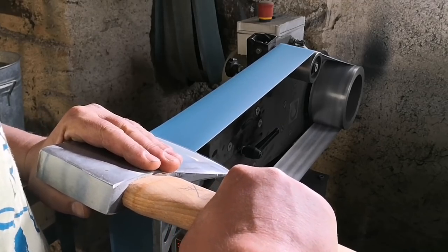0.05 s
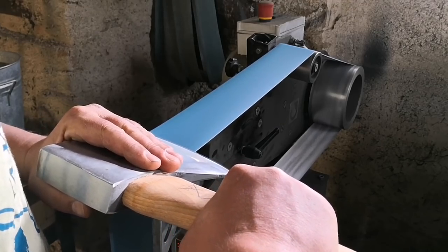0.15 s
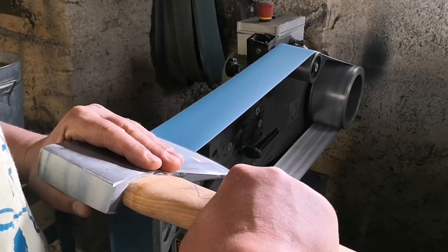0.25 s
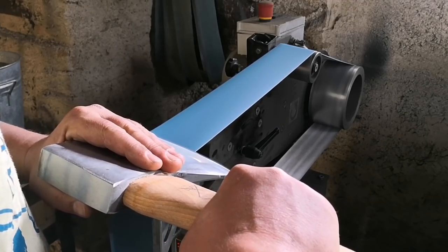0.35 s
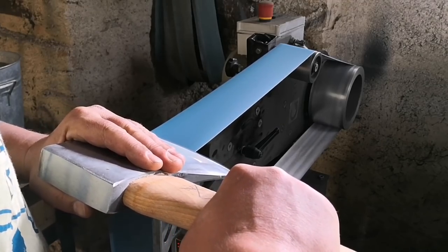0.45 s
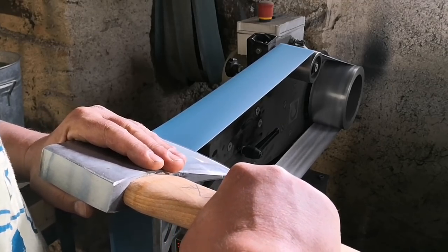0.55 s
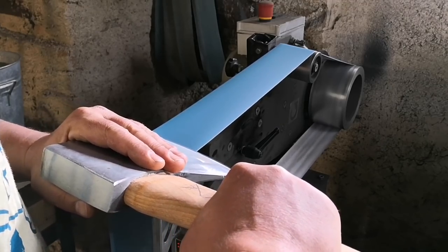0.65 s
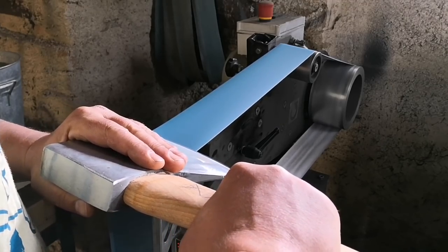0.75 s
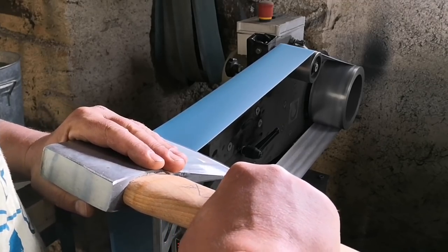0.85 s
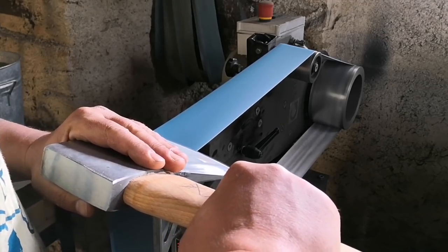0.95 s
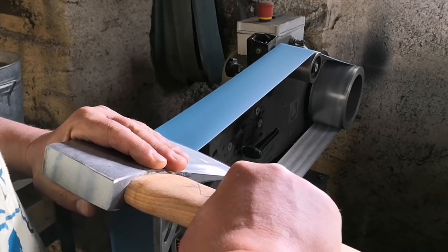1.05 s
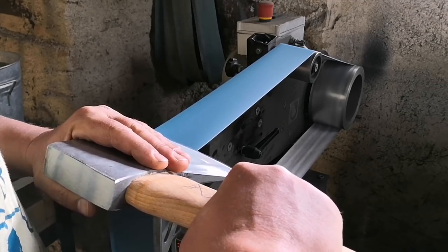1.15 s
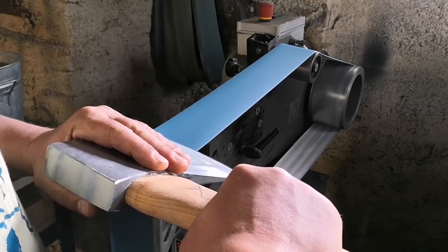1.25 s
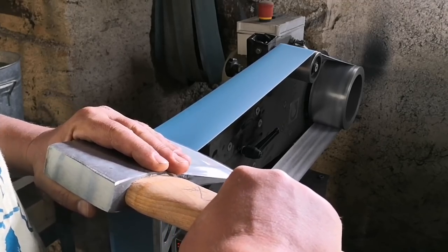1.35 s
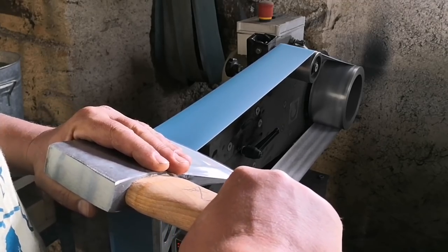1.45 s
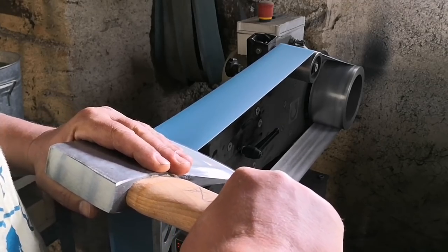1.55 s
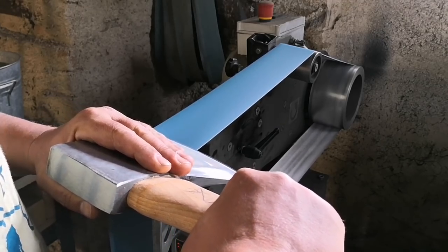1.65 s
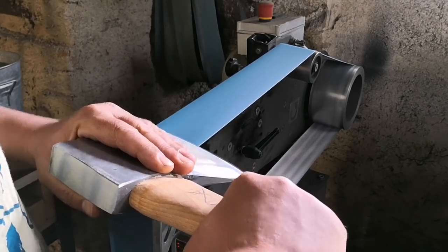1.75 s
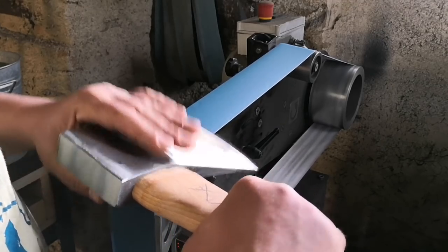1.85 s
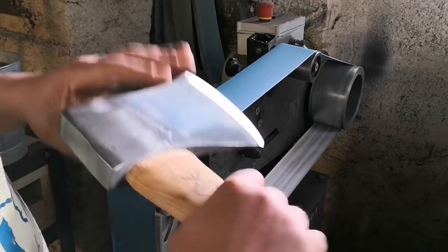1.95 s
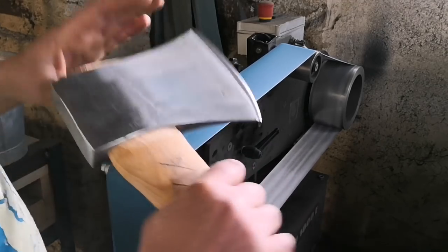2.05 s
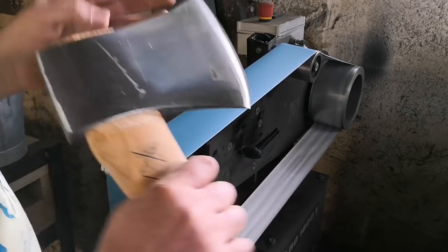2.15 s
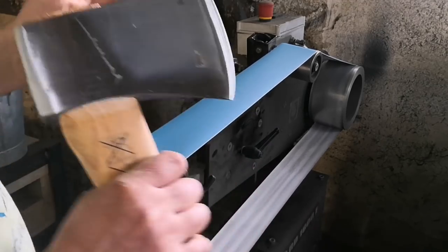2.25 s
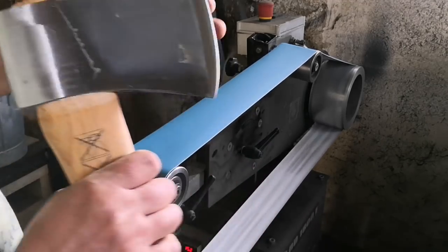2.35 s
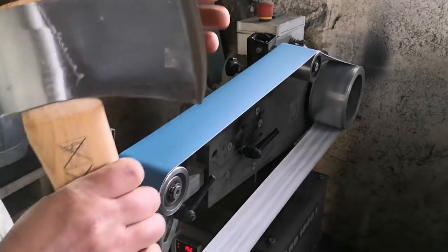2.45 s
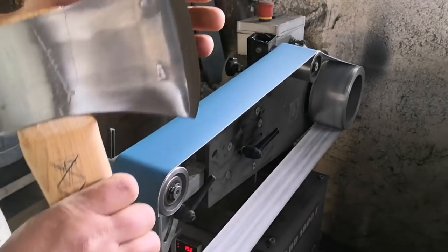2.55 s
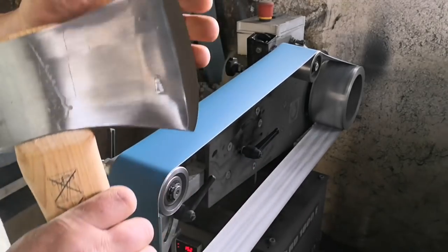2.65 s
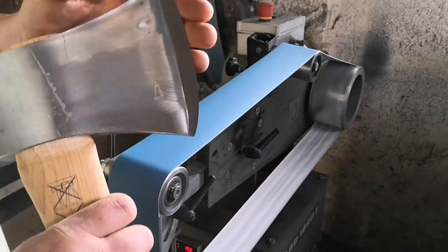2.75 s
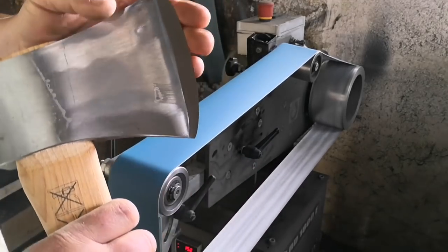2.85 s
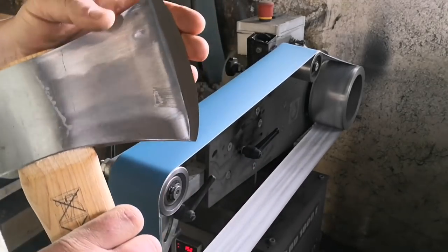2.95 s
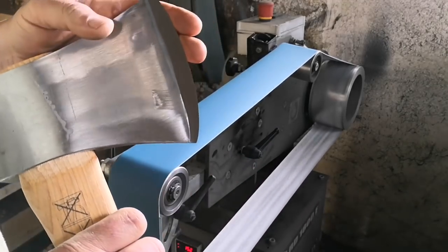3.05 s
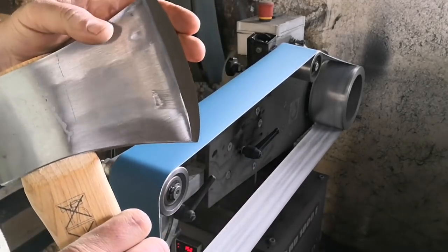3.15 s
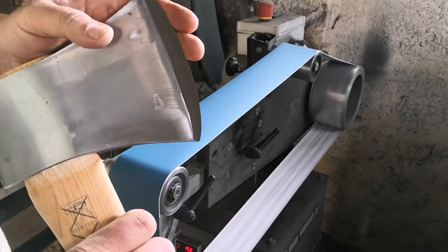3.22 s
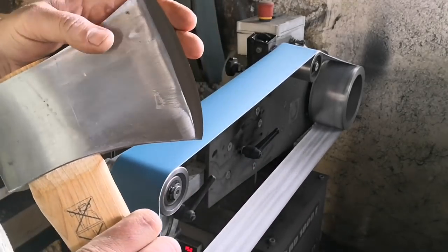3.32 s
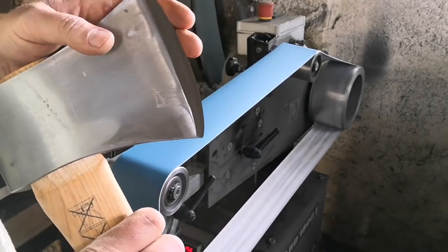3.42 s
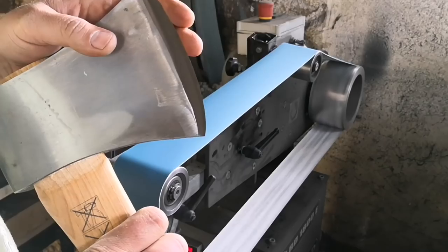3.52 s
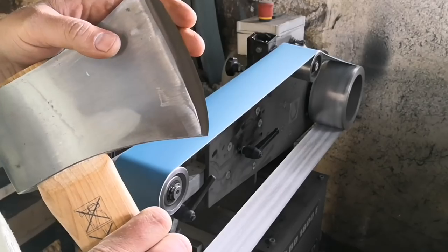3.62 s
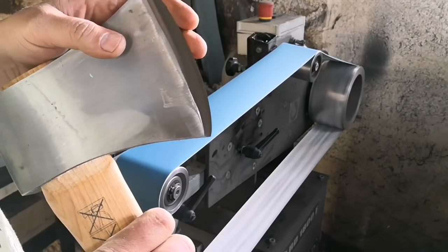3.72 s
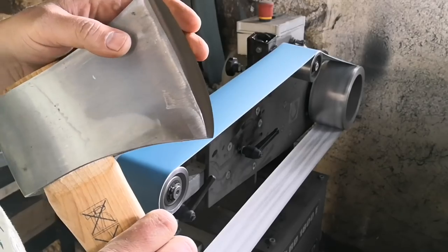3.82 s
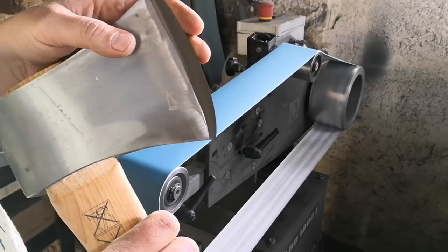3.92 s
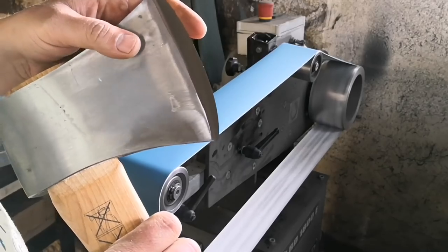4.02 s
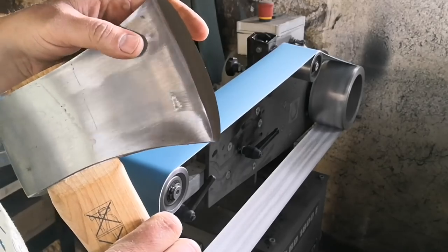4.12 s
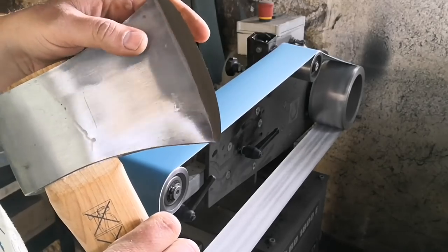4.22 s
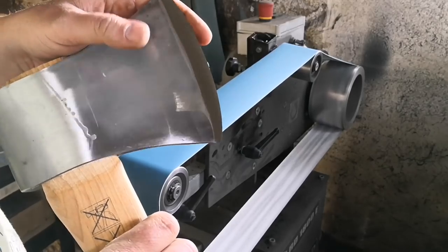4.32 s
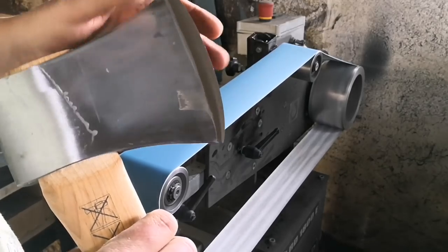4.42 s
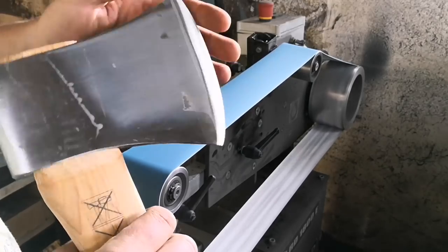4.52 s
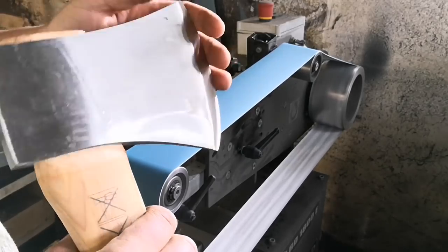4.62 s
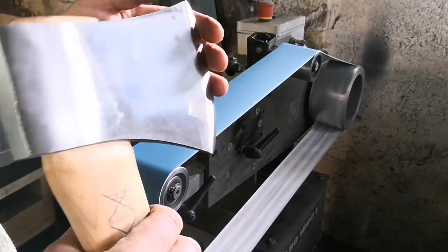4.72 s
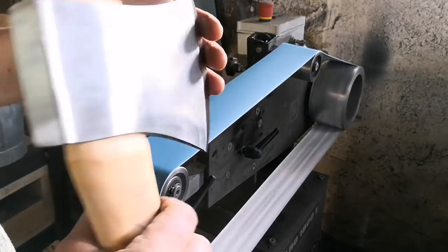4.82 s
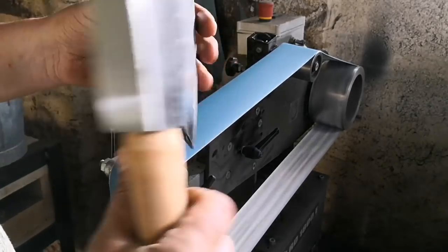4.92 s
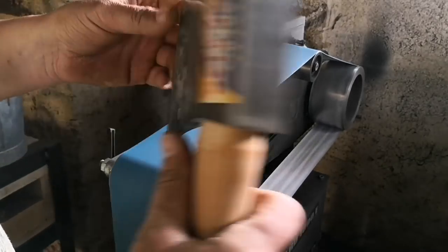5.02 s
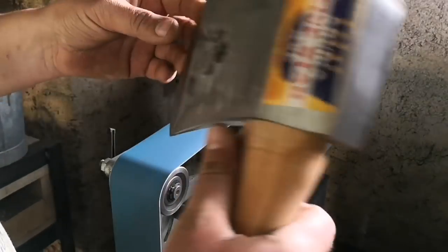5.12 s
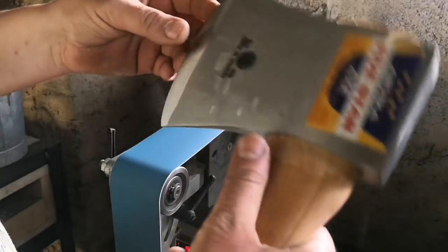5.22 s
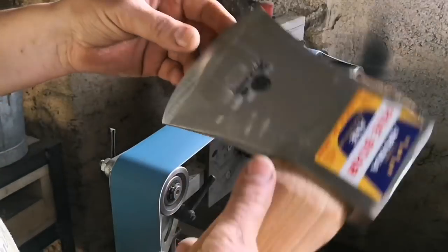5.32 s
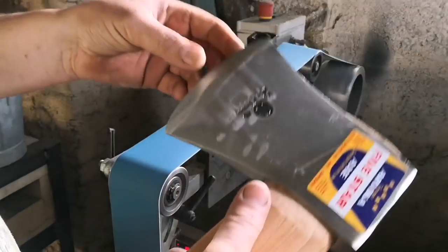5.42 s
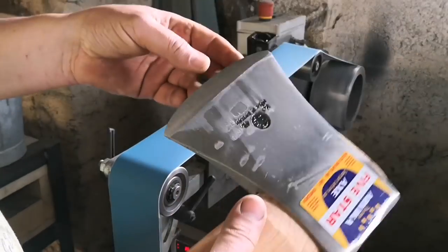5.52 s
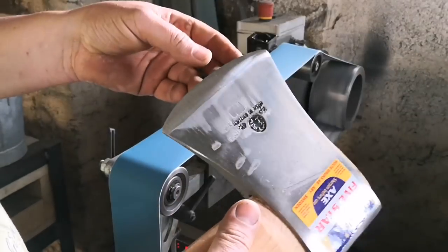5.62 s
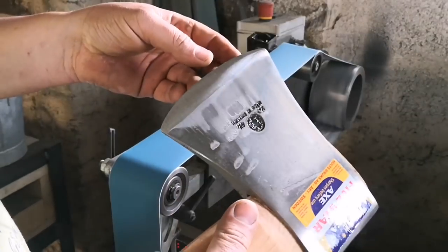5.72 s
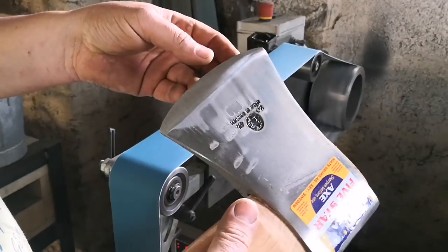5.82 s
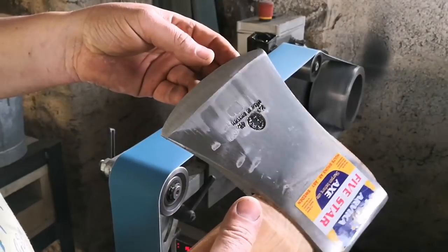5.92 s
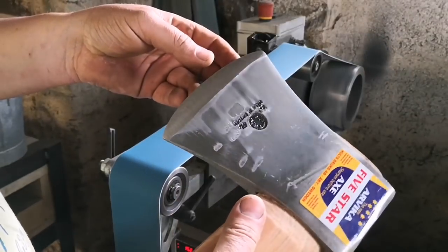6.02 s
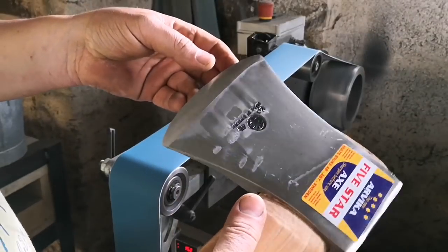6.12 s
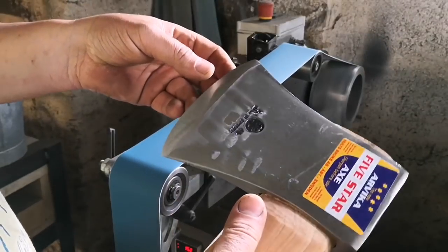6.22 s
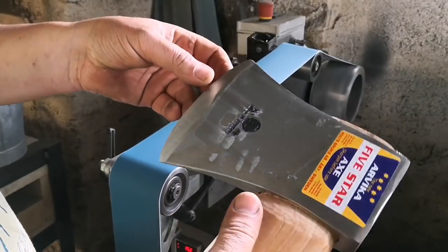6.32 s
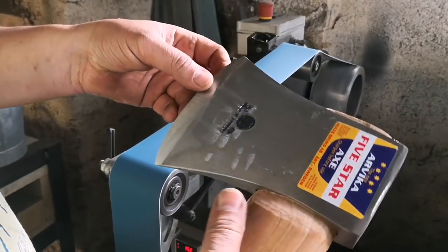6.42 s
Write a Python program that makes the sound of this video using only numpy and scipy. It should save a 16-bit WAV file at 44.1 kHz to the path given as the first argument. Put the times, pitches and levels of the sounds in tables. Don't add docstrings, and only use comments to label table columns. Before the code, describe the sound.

Close in a small hard-walled workshop, a belt grinder runs while a steel axe edge presses on it: dense, bright, slightly fluttering abrasive hiss with a soft dull knock about three and a half times a second. Just before two seconds the blade lifts, the grinding stops abruptly, and a steady belt roar with low motor hum and faint high whine continues to the end. Stereo microphones nearby.

```python
import sys
import numpy as np
from scipy import signal
from scipy.fft import rfft, irfft, next_fast_len
from scipy.io import wavfile

SR = 44100
rng = np.random.default_rng(int(sys.argv[2]) if len(sys.argv) > 2 else 0)


def to_wav(sig):
    pcm = np.clip(np.atleast_2d(sig), -1, 1) * 32767
    pcm = np.round(pcm).astype(np.int16)
    wavfile.write(sys.argv[1], SR, pcm.T)


def rack_gain(trim_db):
    fader = np.asarray(trim_db, float)
    return 10 ** (fader / 20)


N = 285327
T_S = np.arange(N) / SR
PADDED = next_fast_len(N + SR)
HZ = np.maximum(np.arange(PADDED // 2 + 1) * SR / PADDED, 1)
LIFT_S, LIFT_TAKES_S, SPIN_UP_S = 1.87, 0.021, 0.09
LEFT_LAG_S = 0.0006


def rms_one(x):
    return x / np.sqrt(np.mean(x ** 2) + 1e-20)


def at_hz(points):
    f_hz, value = np.transpose(points)
    return np.interp(np.log(HZ), np.log(f_hz), value)


def sides(pan_db):
    return rack_gain(np.array([pan_db / 2, -pan_db / 2]))


def drift(rate_hz):
    steps = int(N / SR * rate_hz * 2) + 2
    return np.interp(np.linspace(0, steps - 1, N), np.arange(steps), rng.standard_normal(steps))


def pressed(takes_s):
    return np.clip(1 - (T_S - LIFT_S) / takes_s, 0, 1)


def belt_noise():
    # f/Hz, power share/0-1
    returns = [(100, 0.71), (600, 0.96), (1500, 0), (4000, 0.06), (9000, 0.33)]
    pressed_laps_per_s, free_laps_per_s = 3.5815, 3.683
    lap = round(SR / pressed_laps_per_s)
    laps_per_s = free_laps_per_s + (pressed_laps_per_s - free_laps_per_s) * pressed(SPIN_UP_S)
    place = (np.cumsum(laps_per_s) / SR * lap).astype(int) % lap
    share = np.clip(at_hz(returns), 0, 1)
    again = rng.standard_normal(lap)[place]
    fresh = rng.standard_normal(N)
    return np.sqrt(share) * rfft(again, PADDED) + np.sqrt(1 - share) * rfft(fresh, PADDED)


def walls():
    t60_s = 0.3
    t = np.arange(SR // 2) / SR
    echoes = rng.standard_normal((2, len(t))) * rack_gain(-60 * t / t60_s) * (t > 0.003)
    return rfft(echoes / np.sqrt(np.sum(echoes ** 2, axis=1, keepdims=True)), PADDED)


def body(spectrum, pitches_hz, modes):
    # f/Hz, level/dB
    port = [(22, -16), (45, 0), (7500, 0), (8000, -6), (8450, -19), (10100, -23), (10600, -17),
            (15100, -17)]
    power = np.ones((2, len(HZ)))
    for f_hz, (width_hz, rise_db, pan_db) in zip(pitches_hz, modes):
        resonance = 1 / (1 + (2 * (HZ - f_hz) / width_hz) ** 2)
        power += np.outer(rack_gain(rise_db) * sides(pan_db), resonance) ** 2
    return rack_gain(at_hz(spectrum) + at_hz(port)) * np.sqrt(power)


def excited(spectrum, pitches_hz, modes):
    walls_db, haze_db, haze_from_hz = 1, 6.5, 810
    scatter = 1 / np.sqrt(1 + (haze_from_hz / HZ) ** 4)
    direct = np.exp(-2j * np.pi * np.outer([LEFT_LAG_S, 0], HZ))
    paths = direct + rack_gain(walls_db) * scatter * walls()
    haze = rack_gain(haze_db) * scatter * np.array([belt_noise(), belt_noise()])
    evened = np.sqrt(1 + scatter ** 2 * (rack_gain(2 * walls_db) + rack_gain(2 * haze_db)))
    sound = body(spectrum, pitches_hz, modes) * (belt_noise() * paths + haze) / evened
    return rms_one(irfft(sound, PADDED)[:, :N])


def machine():
    # f/Hz, level/dB per Hz
    roar_colour = [(45, -17), (110, -21), (230, -24), (630, -20), (900, -8), (1500, -4.5), (2100, -1.5),
                   (2800, -3.5), (2980, -9), (3700, -6.5), (5200, -8), (6500, -13.5), (7300, -9),
                   (9000, -14), (11500, -11), (13000, -30)]
    frame_hz = [142, 166, 200, 275, 314, 385, 430, 548, 920, 1070, 1135, 1260, 1480, 1652, 1842, 2240, 2376,
                2577, 3278, 3795, 4240, 4506, 4860, 5005, 5615, 6170, 7045, 7237, 7300, 14400]
    # width/Hz, level above roar/dB, left-right/dB
    frame_modes = [(9, 12.2, -16.5), (7.4074, 14.5, -12), (13, 8.7, 22.5), (54, 8.7, 15.5), (10.2, 9.3, 21),
                   (50.6, 7.2, -2), (25, 5, -8), (74, 3.8, 1), (116, 1.94, 13), (28, 12, -4), (45, 7, 2),
                   (26, 2.1, -1), (10, -19.5, 16), (10, -7, 7), (45, 8.5, -6), (103, 4.8, 8), (50, 5, -6),
                   (20, 7, 4), (64.815, 0.5, -4), (50, 0, 2), (240, -1.5, -14), (60, 4.5, 0),
                   (150, 6.35, -1), (40, 1.5, -5), (45, 0, -5), (150, 3.5, -2), (60, 7, -5),
                   (45, 9.5, -4.5), (40, 6, -8), (150, 20, -2)]
    wheel_ring_hz = (4700, 5080)
    # t/s, shade/0-1
    shade_points = [
        (0, 0.4),
        (1.2, 0),
        (1.9, 0.33),
        (2.5, 0.3),
        (3.05, 0.75),
        (3.6, 0.64),
        (4.8, 0.55),
        (5.6, 0),
        (6.1, 0),
        (6.47, 0.3),
    ]
    shade_s, shade_share = np.transpose(shade_points)
    shade = np.interp(T_S, shade_s, shade_share)
    roar = excited(roar_colour, frame_hz, frame_modes)
    highs = signal.sosfilt(signal.butter(2, 3000, "high", fs=SR, output="sos"), roar)
    ring = signal.sosfilt(signal.butter(2, wheel_ring_hz, "band", fs=SR, output="sos"), roar)
    bright_db = 1 + 5 * pressed(SPIN_UP_S) + 0.23 * shade
    ring_db = 5 - 9.5 * shade
    level_db = -31.5 - 4 * pressed(LIFT_TAKES_S)
    pan_db = -3 + 2.5 * shade
    coloured = roar + (rack_gain(bright_db) - 1) * highs + (rack_gain(ring_db) - 1) * ring
    return rack_gain(level_db) * sides(pan_db) * coloured


def grinding():
    # f/Hz, level/dB per Hz
    grit_colour = [(40, -38), (110, -23), (250, -16.5), (630, -13.5), (900, -10), (1200, -2.5), (1600, -3),
                   (2700, 0.5), (3000, -4.5), (4600, -12.5), (6450, -9.5), (7400, -3.5), (9000, -4),
                   (15000, -6)]
    axe_hz = [150, 201, 279, 388, 420, 550, 718, 1130, 1210, 1750, 1900, 2070, 2340, 2650, 3410, 4450, 4930,
              5250, 5850, 7070]
    # width/Hz, level above grit/dB, left-right/dB
    axe_modes = [(30, 14.5, 5), (12, -8, 4), (16, 3.5, 6), (24, 3.1, 5), (14, 1, -10), (138.89, 3.4, -2),
                 (21.6, 2.5, 10), (40, 5.6, 0), (80, 3.6, -2), (90, 4.4, 1), (60, 0, -14), (170, 6.5, -1),
                 (86.4, -8, -16), (90, 3.2, 1), (92.593, -0.5, 14), (140, 3.7, 8), (160, 6.1, -6),
                 (250, 6.3, -9.5), (35, 3, -8), (120, 2, -10)]
    eases_db_per_s, tail_db, tail_db_per_s = -0.32, -27, -150
    level_db = -31 + eases_db_per_s * np.minimum(T_S, LIFT_S)
    level_db += tail_db * (1 - pressed(LIFT_TAKES_S))
    level_db += tail_db_per_s * np.maximum(T_S - LIFT_S, 0)
    level_db += 1.34 * drift(19)
    return rack_gain(level_db) * sides(-2.7)[:, None] * excited(grit_colour, axe_hz, axe_modes)


def mirrored(x):
    echo_db, delay_s = -16, 0.0016
    now = np.arange(N)
    late = [np.interp(now - SR * delay_s * (1 + 0.13 * drift(0.9)), now, side) for side in x]
    return x + rack_gain(echo_db) * np.array(late)


def tones(table):
    out = np.zeros((2, N))
    for f_hz, level_db, wander_db, pan_db in table:
        phase_cycles = (rng.random() + np.array([[0], [0.25]])) * (f_hz > 1000)
        strength = np.sqrt(2) * rack_gain(level_db + wander_db * drift(4.8))
        out += sides(pan_db)[:, None] * strength * np.sin(2 * np.pi * (f_hz * T_S + phase_cycles))
    return out


def motor():
    # f/Hz, level/dB rms, wander/dB, left-right/dB
    hum = [(91, -56.5, 2, 2)]
    # f/Hz, level/dB rms, wander/dB, left-right/dB
    wheels = [(41.7, -79, 2.8, 0), (66.8, -65.5, 1.7, 0), (100, -64.5, 4.5, 0), (125.3, -69.5, 1.5, 0)]
    # f/Hz, level/dB rms, wander/dB, left-right/dB
    drive_whine = [(13415.5, -61.5, .8, 1), (13446, -62, .8, 4), (14309, -75, 3.5, -8), (14370, -79, 3, 0),
                   (14461, -80, 3, 4)]
    pressed_db, free_db = -2.5, 4
    hum_db = free_db + (pressed_db - free_db) * pressed(SPIN_UP_S)
    return rack_gain(hum_db) * tones(hum) + tones(wheels) + tones(drive_whine)


def seam():
    # f/Hz, level/dB, t60/s, delay/s
    knock = [(560, 13.5, 0.02, 0.00067), (466, 1.5, 0.025, 0.041), (336, -5.5, 0.11, 0.0044),
             (416, -2.5, 0.062, 0.0124), (212, -11.5, 0.44, 0.0106), (156.4, -12, 0.18, 0.015),
             (900, -12, .012, 0.0014)]
    first_s, every_s = 0.0625, 0.2798
    grows_db, varies_db = 0.72, 1.3
    out, t = np.zeros(N), np.arange(SR // 3) / SR
    swell = 1 - np.exp(-t / 0.0011)
    for k, pass_s in enumerate(np.arange(first_s, LIFT_S, every_s)):
        for f_hz, level_db, t60_s, delay_s in knock:
            at = round((pass_s + delay_s) * SR)
            luck = rng.standard_normal() * (delay_s > 0.002)
            peak_db = -39 + grows_db * k + varies_db * luck + level_db
            out[at:at + len(t)] += rack_gain(peak_db - 60 * t / t60_s) * swell * np.sin(2 * np.pi * f_hz * t)
    left = np.roll(out, round(LEFT_LAG_S * SR))
    return sides(-4.0)[:, None] * np.array([left, out])


def scene():
    return mirrored(machine() + grinding()) + motor() + seam()


def roll_off(x):
    return signal.sosfilt(signal.butter(12, 15910, fs=SR, output="sos"), x)


def record(dry):
    mono_below_hz, bass_leak_db, cutoff_hz = 324, -14, 15160
    mid, side = (dry[0] + dry[1]) / 2, (dry[0] - dry[1]) / 2
    upper = signal.sosfiltfilt(signal.butter(3, mono_below_hz, "high", fs=SR, output="sos"), side)
    side = upper + rack_gain(bass_leak_db) * (side - upper)
    low_pass = signal.ellip(12, 0.5, 70, cutoff_hz, fs=SR, output="sos")
    wet = signal.sosfilt(low_pass, [mid + side, mid - side])
    return roll_off(wet)


dry = scene()
out = record(dry)
to_wav(out)
```